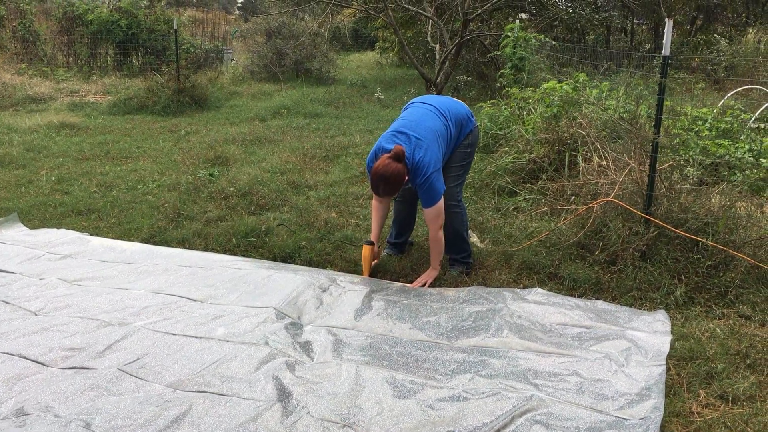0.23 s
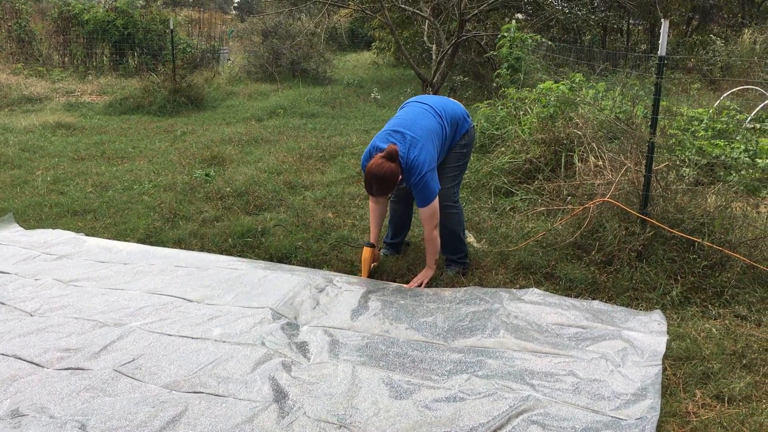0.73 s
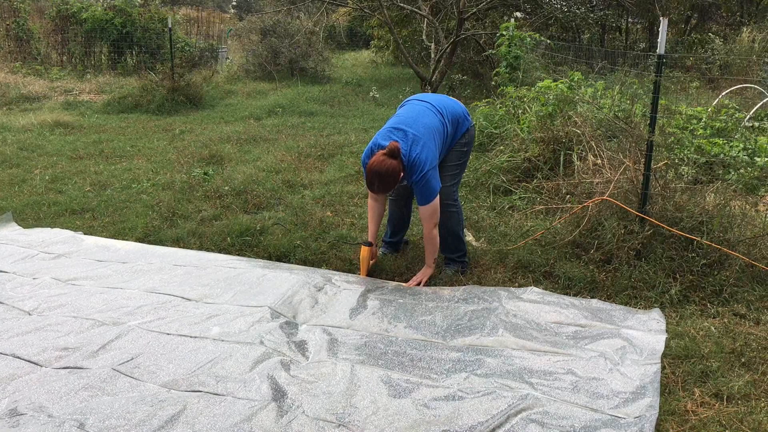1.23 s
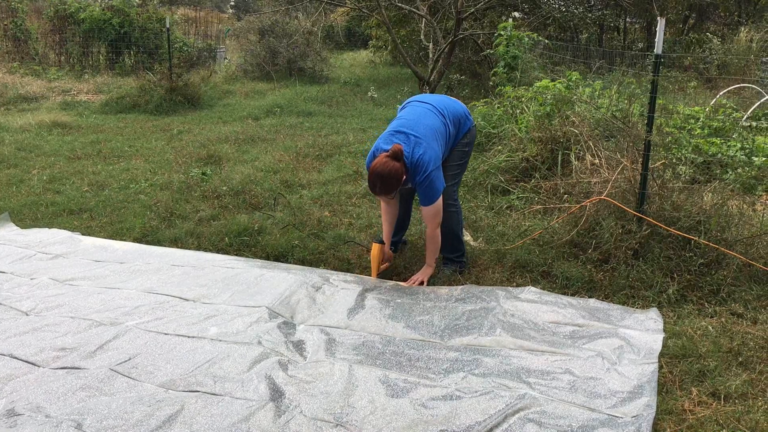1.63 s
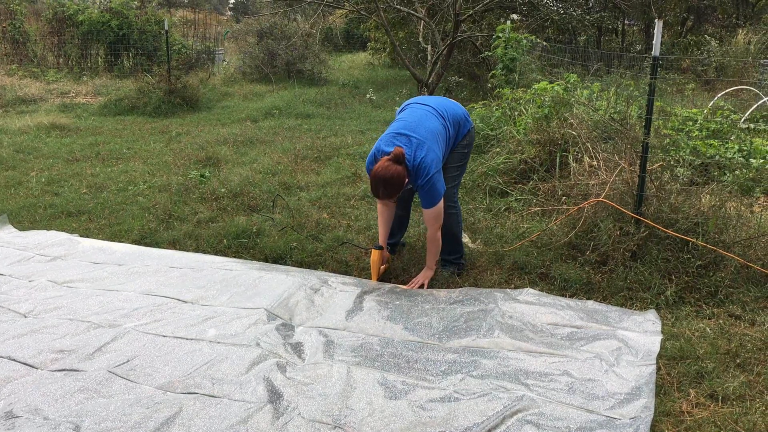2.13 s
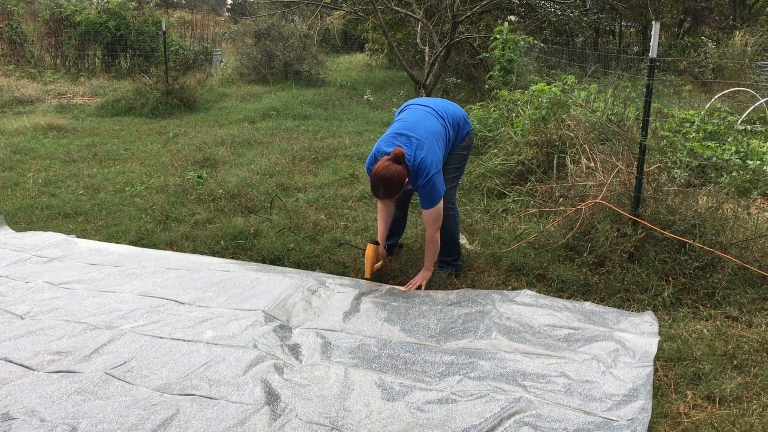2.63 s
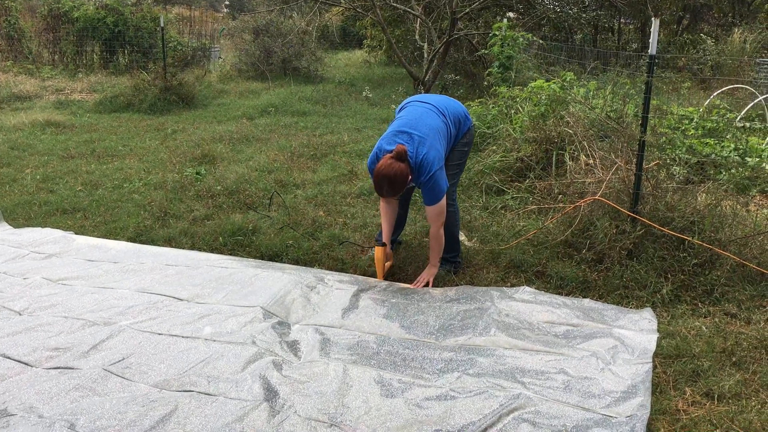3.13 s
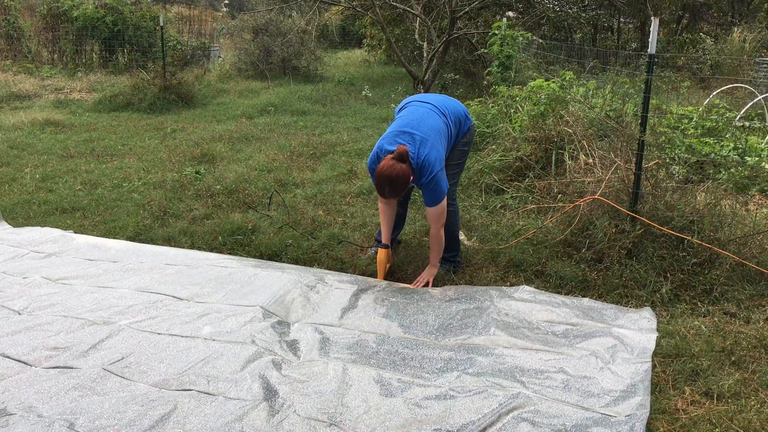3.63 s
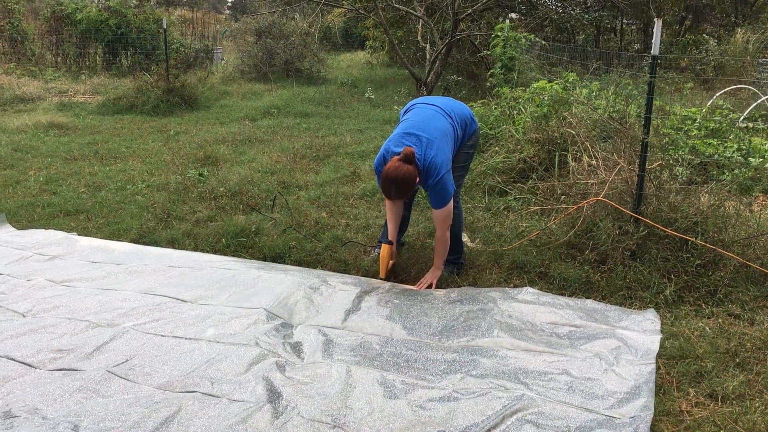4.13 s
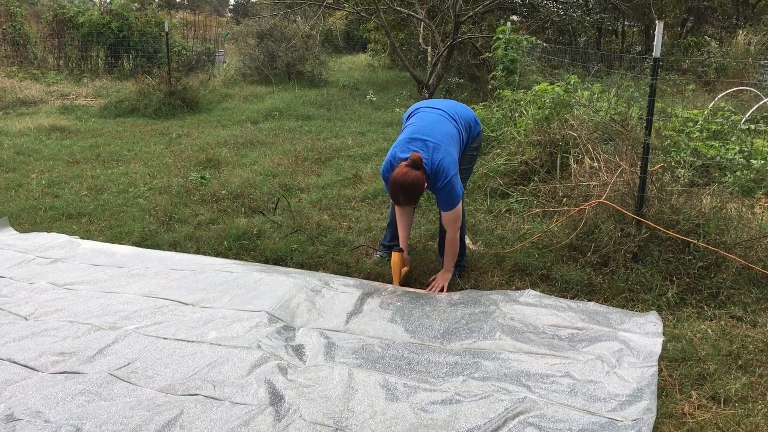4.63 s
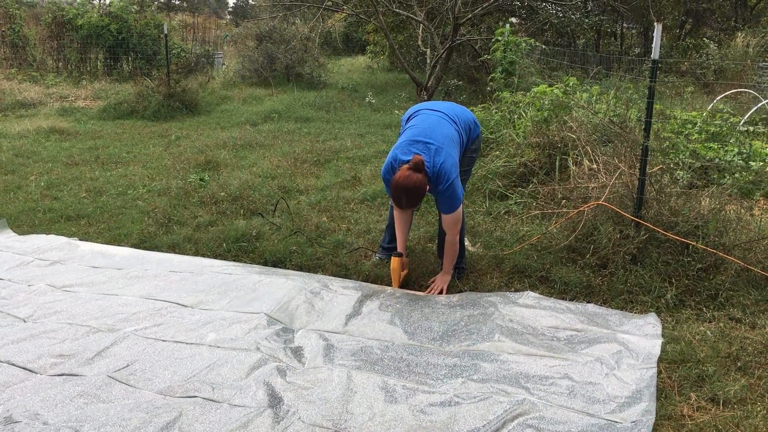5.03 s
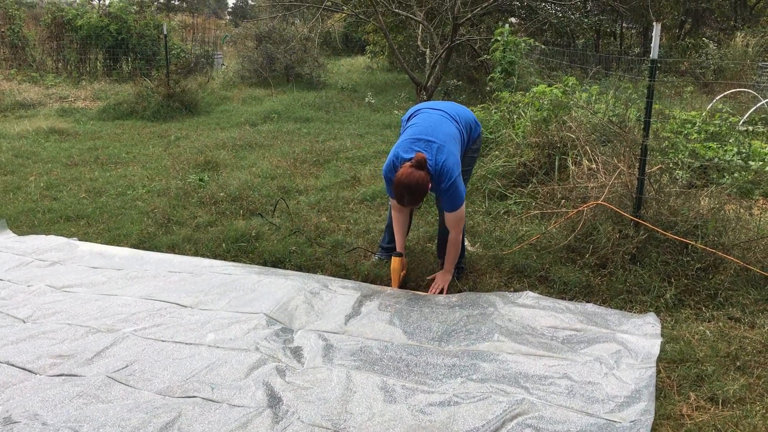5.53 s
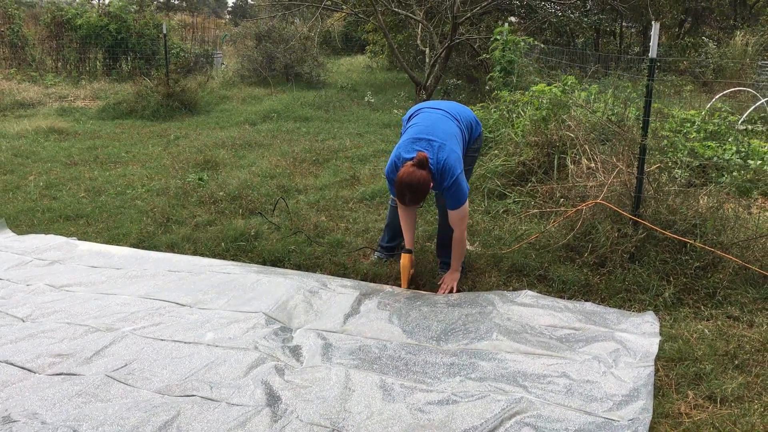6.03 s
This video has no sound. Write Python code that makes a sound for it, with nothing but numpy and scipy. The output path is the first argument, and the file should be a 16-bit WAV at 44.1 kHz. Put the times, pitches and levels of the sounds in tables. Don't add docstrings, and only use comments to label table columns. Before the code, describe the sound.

An electric staple gun fires four times, a little over a second apart, a few metres from the microphone on an open lawn. Each shot is a very loud, dry snap with a tiny metallic rattle before it and a small clack just after, as wood and casing ring briefly. Underneath, light rain hisses softly on plastic sheeting, with stray heavier drops, and a faint wind rumbles on the microphone.

```python
import sys
import numpy as np
from scipy import signal
from scipy.fft import rfft, irfft
from scipy.io import wavfile
from scipy.ndimage import uniform_filter1d

SR = 44100
rng = np.random.default_rng(int(sys.argv[2]) if len(sys.argv) > 2 else 0)


def field_ratio(decibels):
    return 10 ** (np.asarray(decibels, dtype=float) / 20)


def waveform_to_disk(signal):
    frames = np.transpose(np.atleast_2d(signal))
    scaled = np.clip(frames, -1, 1) * 32767
    samples = np.round(scaled).astype(np.int16)
    wavfile.write(sys.argv[1], SR, samples)


N = 276948

# middle in seconds, peak level in dB, length in seconds.
WIND_PUFFS = [(0.045, -49, 0.25), (0.384, -46.5, 0.18), (.5, -46, 0.04), (0.69, -46, .16),
              (0.89, -45.5, .1), (1.014, -48.5, .12), (1.154, -50, .06), (1.346, -47, 0.074),
              (1.65, -52.5, 0.19), (1.885, -46.5, 0.074), (2.057, -48.5, 0.11), (2.267, -46, 0.14),
              (2.6, -49.5, 0.65), (3.137, -50, 0.16), (3.26, -44.5, 0.096), (3.566, -46, 0.42),
              (3.915, -48, 0.05), (4.1, -49.5, 0.33), (4.395, -44.5, 0.11), (4.59, -46, 0.058),
              (4.704, -46.5, 0.066), (4.83, -45, 0.12), (4.964, -46.5, 0.14), (5.1, -44.5, 0.068),
              (5.384, -50, .3), (5.62, -49, 0.16), (5.914, -50.5, .2), (6.132, -46, 0.053),
              (6.232, -43, 0.051)]
# frequency in Hz, level in dB per Hz.
RUMBLE_SPECTRUM = [(12, -40), (20, -12.5), (43, 2), (64, 7), (216, -15), (300, -26), (390, -26),
                   (660, -120)]
# time in seconds, level in dB, frequency in Hz, decay in seconds.
EDDY = (3.2105, -31, 50, .017)
# time in seconds, patter level in dB.
SHOWER = [(0.0, -45), (0.2, -46.5), (2.3, -45.2), (2.9, -46), (3.9, -45), (6.28, -46)]
# frequency in Hz, level in dB per Hz.
SHEET_SPECTRUM = [(120, -28.5), (200, -4.5), (283, -6.5), (365, -5.5), (489, -7.5), (631, -2.5),
                  (2390, 0.27), (2920, -3), (3440, -2), (4860, -9), (5720, -9), (9030, -15), (10400, -15.5),
                  (11700, -17.5), (15600, -24.5)]
# time in seconds, peak level in dB, sheet pitch in Hz.
HEAVY_DROPS = [(0.385, -37, 2460), (0.534, -34.5, 2340), (0.629, -33, 1910), (0.724, -43, 2000),
               (0.849, -31, 2300), (1.3764, -47, 1760), (1.95, -41, 1990), (2.4999, -33.5, 1710),
               (2.545, -43, 1760), (2.9815, -38.5, 1390), (3.014, -34, 2310), (3.3465, -39, 1540),
               (3.406, -35, 1640), (3.5339, -33, 1230), (3.5677, -35.5, 1690), (4.0767, -45, 2450),
               (4.212, -34.5, 1590), (4.2695, -30, 2440), (4.302, -39, 2760), (4.5787, -33.5, 2290),
               (4.782, -36.5, 2530), (5.6355, -32.5, 1270), (5.7496, -37, 2260), (5.957, -31, 2540),
               (6.1986, -31.5, 2180), (6.2373, -35.5, 1920), (6.2568, -37, 1620)]
# time in seconds, peak level in dB, pitch in Hz.
FOLD_TICKS = [(0.0273, -31, 3810), (1.3767, -33, 3500), (1.725, -33, 3780), (1.7759, -33.5, 4030),
              (1.861, -33, 3830), (2.1794, -31.5, 4140), (2.9532, -38, 3580), (3.029, -36, 4180),
              (3.0779, -41, 3770), (3.226, -40, 3890), (3.3475, -32, 6060), (4.2692, -35, 3740),
              (4.3524, -52, 3510), (4.7818, -37, 4120), (5.0514, -40, 4390), (5.066, -40, 5400),
              (5.535, -35, 4280), (5.9554, -30, 3950), (6.238, -33.5, 3820)]
# time in seconds, length in seconds, first and last pitch in Hz, level in dB.
PUDDLE_BUBBLES = [
    (1.961, 0.017, 5950, 7140, -48),
    (5.295, 0.026, 6100, 7900, -50),
]
# delay in seconds, level in dB.
HEDGE_ECHOES = [
    (.031, -53),
    (.052, -32),
    (.118, -36),
]
# trigger in seconds, then slam, rebound spacing and fall-back in seconds after it.
STAPLE_SHOTS = [
    (1.0732, .0049, .0033, .0200),
    (2.3733, .0050, .0031, .0244),
    (3.9067, .0048, .0032, .0215),
    (5.3237, .0044, .0022, .0207),
]
# board, casing and steel levels in dB, casing brightness in dB per octave,
# fall-back level in dB.
STAPLE_SEATING = [
    (-2, -2.5, 0.5, 2, 0.5),
    (-1.6, 1, -1, -7, -4),
    (-1, 0.1, 0.1, 0, -2),
    (-3.5, -7, 0, -5, 1.5),
]
# frequency in Hz, level in dB.
BOARD_MODES = [
    [(240, -13), (320, -13.5), (570, -20), (700, -3.5), (870, 6.5), (1000, 5), (1140, 1), (1300, 2),
     (1480, 3), (1650, 0.5), (1950, -8), (2250, -7)],
    [(170, -16), (240, -15), (340, -12.5), (500, -11), (720, -9.5), (850, 4.5), (990, 1), (1130, 4),
     (1310, 5), (1620, 4), (1950, -5), (2250, -1.5)],
    [(160, -16), (260, -22), (370, -23), (650, -6.5), (770, -1), (950, 4), (1150, -5), (1300, 2), (1550, 3),
     (1750, -2), (1960, 8), (2240, 6.5)],
    [(160, -17), (250, -29), (500, -18), (650, -23), (880, -6), (1130, -3.5), (1300, -13), (1490, 1),
     (1680, -2), (1900, -15), (2050, -1), (2250, -4)],
]
# frequency in Hz, level in dB, 60 dB decay in seconds.
CASING_MODES = [(2641, -1.5, 0.018), (3060, -7.5, 0.037), (3142, 3.5, 0.011), (3620, -13.5, 0.027),
                (3950, 0, 0.011), (3970, 14.5, 0.0047), (4620, -0.5, 0.012), (5560, -5, 0.005),
                (6200, -9.5, 0.004)]
# frequency in Hz, level in dB, 60 dB decay in seconds.
STEEL_MODES = [(6900, -6.5, 0.006), (7640, 0, 0.0022), (8800, -6, 0.0052), (9720, 4.5, 0.00093),
               (12160, -15.5, 0.009), (12000, -54.5, 0.0024), (14300, -23, 0.005)]
# board, casing and steel levels in dB.
SLAM_BLOWS = [
    (-6, -12, -6),
    (-6.5, -0.5, -1),
    (-9.5, -5, -12.5),
    (-9, -10, -20),
]
# delay in seconds, board, casing and steel levels in dB.
STOP_BLOWS = [
    (0, -12, -16, -40),
    (.0028, -23, -46, -21),
    (.0058, -31, -41, -34),
]
# frequency in Hz, level in dB per Hz.
RUSTLE_SPECTRUM = [(300, -42), (1200, 3), (3500, 15), (8000, 7.5), (15000, 1)]

LULL_DB = -55
DROP_CUT_HZ = 11000
BOARD_T60_S = 0.032
GRIP_SPREAD_DB = -2
TIP_LEAD_S = 0.0009
RATTLE_DB, SCRAPE_CUT_HZ = -22, 8500
CHATTER_DB, CHATTER_S = 3, 0.0036
SETTLE_DB, SETTLE_S = -21.5, 0.0057
CRACK_DB, CRACK_S = -2.5, 0.00006
RUSTLE_DB = -42
LINGER_DB, LINGER_S = -14, 0.047
PORT_HZ, TOP_HZ = 10400, 15750
SHOT_N = 6000


def noted(rows):
    s, db = np.transpose(rows)
    return field_ratio(np.interp(np.arange(N) / SR, s, db))


def rms_one(x):
    return x / np.sqrt(np.mean(x ** 2) + 1e-20)


def coloured(x, spectrum, size=2048):
    hz, db = np.transpose(spectrum)
    bins_hz = np.arange(size // 2 + 1) * SR / size
    log_gain = np.log(field_ratio(np.interp(np.log(bins_hz + 1), np.log(hz), db)))
    cepstrum = irfft(log_gain)
    cepstrum[1:size // 2] *= 2
    cepstrum[size // 2 + 1:] = 0
    response = irfft(np.exp(rfft(cepstrum)))
    return signal.oaconvolve(x, response)[:len(x)]


def ring(force, modes, strengths=None):
    out = np.zeros(len(force))
    for k, (hz, db, t60) in enumerate(modes):
        r = field_ratio(-60 / (t60 * SR))
        w = 2 * np.pi * hz / SR
        sign = (-1) ** k if strengths is None else strengths[k]
        resonator = [0, np.sin(w)], [1, -2 * r * np.cos(w), r * r]
        out += field_ratio(db) * sign * signal.lfilter(*resonator, force)
    return out


def puffs():
    s, db, length = np.transpose(WIND_PUFFS)[:, :, None]
    t = np.arange(0, N + 64, 64) / SR
    bells = np.exp(-(2 * (t - s) / length) ** 2)
    power = field_ratio(LULL_DB) ** 2 + np.sum(field_ratio(db) ** 2 * bells, axis=0)
    return np.interp(np.arange(N) / SR, t, np.sqrt(power))


def breeze():
    noise = rng.standard_normal(N + SR)
    air = rms_one(coloured(noise, RUMBLE_SPECTRUM, size=16384)[SR:])
    flutter = np.sqrt(uniform_filter1d(air ** 2, size=3000) + 0.21)
    return puffs() * rms_one(air / flutter)


def buffet():
    s, db, hz, decay_s = EDDY
    t = np.maximum(np.arange(N) / SR - s, 0)
    return -field_ratio(db) * np.sin(2 * np.pi * hz * t) * np.exp(-t / decay_s)


def splat(pitch_hz, last_s, hollow):
    t = np.arange(400) / SR
    crackle = rng.standard_normal(400) * np.exp(-t / last_s)
    burst = crackle + hollow * ring(crackle, [(pitch_hz, 0, 5.0 / pitch_hz)])
    return burst / np.sqrt(np.sum(burst ** 2))


def scatter(per_s, spread_db, pitches_hz, last_s, hollow):
    spots = np.array([splat(hz, last_s, hollow)[:160] for hz in pitches_hz])
    size_draw, time_draw, spot_draw = rng.random((round(per_s * N / SR), 3)).T
    sizes = field_ratio(spread_db * np.minimum(-np.log(size_draw + 1e-12), 4.0))
    at = (time_draw * N).astype(int)[:, None] + np.arange(160)
    sounds = sizes[:, None] * spots[(spot_draw * len(spots)).astype(int)]
    return rms_one(np.bincount(at.ravel(), sounds.ravel(), minlength=N)[:N])


def patter(far_db, tick_db):
    near = scatter(1500.0, 2.15, np.geomspace(900, 7000, 24), last_s=0.00035, hollow=0.14)
    taut = scatter(400.0, 7.0, np.geomspace(4500, 12000, 8), last_s=0.00014, hollow=0.12)
    taut = signal.sosfilt(signal.butter(2, 4200, "high", fs=SR, output="sos"), taut)
    mix = near + field_ratio(tick_db) * taut + field_ratio(far_db) * rng.standard_normal(N)
    return noted(SHOWER) * rms_one(coloured(mix, SHEET_SPECTRUM))


def bubble(length, from_hz, to_hz):
    part = np.linspace(0, 1, round(length * SR))
    phase = 2 * np.pi * np.cumsum(from_hz + (to_hz - from_hz) * part ** 0.82) / SR
    return np.sin(np.pi * part ** 0.51) * np.sin(phase)


def big_drops():
    out = np.zeros(N + 1500)

    def place(s, sound):
        at = round(s * SR)
        out[at:at + len(sound)] += sound

    soften = signal.butter(1, DROP_CUT_HZ, fs=SR, output="sos")
    for s, db, hz in HEAVY_DROPS:
        hit = signal.sosfilt(soften, coloured(splat(hz, 0.0014, 0.06), SHEET_SPECTRUM))
        place(s, field_ratio(db + 4.0) * hit / np.abs(hit).max())
    for s, db, hz in FOLD_TICKS:
        hit = np.diff(coloured(splat(hz, 0.0014, 0.51), SHEET_SPECTRUM), prepend=0)
        place(s, field_ratio(db + 1.0) * hit / np.abs(hit).max())
    for s, length, from_hz, to_hz, db in PUDDLE_BUBBLES:
        place(s, field_ratio(db) * bubble(length, from_hz, to_hz))
    return out[:N]


def echoes(x):
    smear = rng.standard_normal(900) * np.hanning(900) / 18
    dull = signal.oaconvolve(signal.lfilter([0.45], [1, -0.55], x), smear)[:N]
    return sum(field_ratio(db) * np.roll(dull, round(s * SR)) for s, db in HEDGE_ECHOES)


def gripped(modes, db_per_octave):
    chance = GRIP_SPREAD_DB * rng.standard_normal(len(modes))
    held = []
    for (hz, db, t60), held_db in zip(modes, chance):
        held.append((hz, db + held_db + db_per_octave * np.log2(hz / 4000), t60))
    return held


def contacts(slam, spacing, back, back_db):
    delays = (slam - TIP_LEAD_S, slam, slam + spacing, slam + 2 * spacing)
    driven = [(s, *dbs) for s, dbs in zip(delays, SLAM_BLOWS)]
    fallen = [(back + s, *np.add(dbs, back_db)) for s, *dbs in STOP_BLOWS]
    return driven + fallen


def struck(since, modes, contact_s):
    force = 0.34 * rng.standard_normal(len(since)) * np.exp(-np.arange(len(since)) / SR / contact_s)
    force[0] = 1
    sound = ring(force + 1e-18, modes, rng.choice([-1, 1], len(modes)))
    wait = np.searchsorted(since, 0)
    return np.pad(sound, (wait, 0))[:len(since)] / np.abs(sound).max()


def slide_rattle(t, slam, back, board, casing):
    chatter = field_ratio(CHATTER_DB) * np.exp((slam - t) / CHATTER_S)
    scrape = rng.standard_normal(SHOT_N) * np.where(t < slam, 1, chatter)
    speed = 0.46 + 0.78 * np.minimum(t / slam, 1)
    scrape *= np.minimum(t / 0.00028, 1) * speed
    settling = (t > back) * (t < back + SETTLE_S)
    scrape += field_ratio(SETTLE_DB) * rng.standard_normal(SHOT_N) * settling
    scrape = signal.sosfilt(signal.butter(2, SCRAPE_CUT_HZ, fs=SR, output="sos"), scrape)
    rattle = scrape * 1.9 + 0.13 * ring(scrape, STEEL_MODES)
    rattle += 0.064 * ring(scrape, casing) + 0.022 * ring(scrape, board)
    return field_ratio(RATTLE_DB) * rattle / np.sqrt(np.mean(rattle[t < slam] ** 2))


def suction_crack(t, slam):
    edge = ((t - slam) / CRACK_S) ** 2
    return -field_ratio(CRACK_DB) * (1 - edge) * np.exp(-edge / 2)


def sheet_rustle(t, slam):
    unevenness = field_ratio(0.63 * np.repeat(rng.standard_normal(100), 60))
    rustle = rng.standard_normal(SHOT_N) * unevenness
    after = np.maximum(t - slam, 0)
    fade = np.exp(-after / 0.014) + field_ratio(LINGER_DB) * np.exp(-after / LINGER_S)
    rustle *= fade * (t > slam)
    return field_ratio(RUSTLE_DB) * rms_one(coloured(rustle, RUSTLE_SPECTRUM))


def stapler():
    out = np.zeros(N)
    t = np.arange(SHOT_N) / SR
    for timing, seating, modes in zip(STAPLE_SHOTS, STAPLE_SEATING, BOARD_MODES):
        start, slam, spacing, back = timing
        wood_db, shell_db, metal_db, tilt_db, back_db = seating
        board = [(hz, db, BOARD_T60_S * (1000 / hz) ** 0.48) for hz, db in modes]
        casing = gripped(CASING_MODES, tilt_db)
        steel = gripped(STEEL_MODES, 0)
        shot = slide_rattle(t, slam, back, board, casing)
        for s, board_db, casing_db, steel_db in contacts(slam, spacing, back, back_db):
            since = t - s
            shot += field_ratio(board_db + wood_db - 2) * struck(since, board, contact_s=0.00068)
            shot += field_ratio(casing_db + shell_db - 4.0) * struck(since, casing, contact_s=0.00058)
            shot += field_ratio(steel_db + metal_db - 4.0) * struck(since, steel, contact_s=0.00016)
        shot += field_ratio(metal_db) * suction_crack(t, slam)
        shot += sheet_rustle(t, slam)
        at = round(start * SR)
        out[at:at + SHOT_N] += shot
    return out


def scene():
    gun = stapler()
    rain = field_ratio(0.2) * patter(far_db=-1.5, tick_db=-5.5) + big_drops()
    return (gun + echoes(gun) + rain + breeze() + buffet())[None]


def roll_off(x):
    return signal.sosfilt(signal.butter(12, 16640, fs=SR, output="sos"), x)


def record(dry):
    port = dry - 0.61 * signal.lfilter(*signal.iirpeak(PORT_HZ, 18.0, fs=SR), dry)
    steep = signal.ellip(12, 0.3, 60, TOP_HZ, fs=SR, output="sos")
    cut = signal.sosfilt(steep, np.clip(port, -1, 1))
    return roll_off(cut)


dry = scene()
out = record(dry)
waveform_to_disk(out)
```